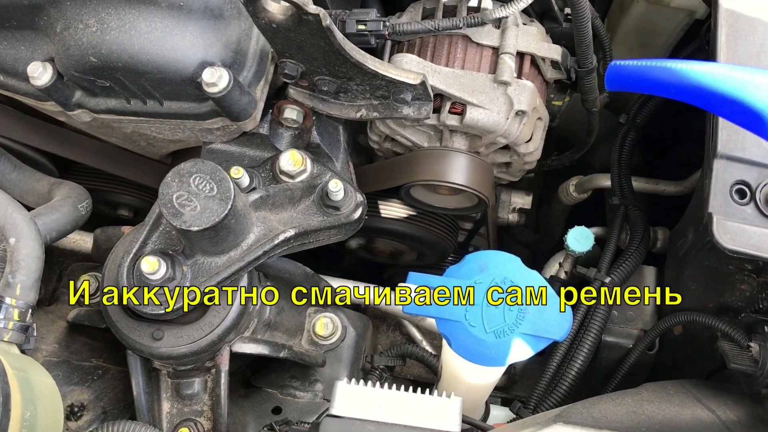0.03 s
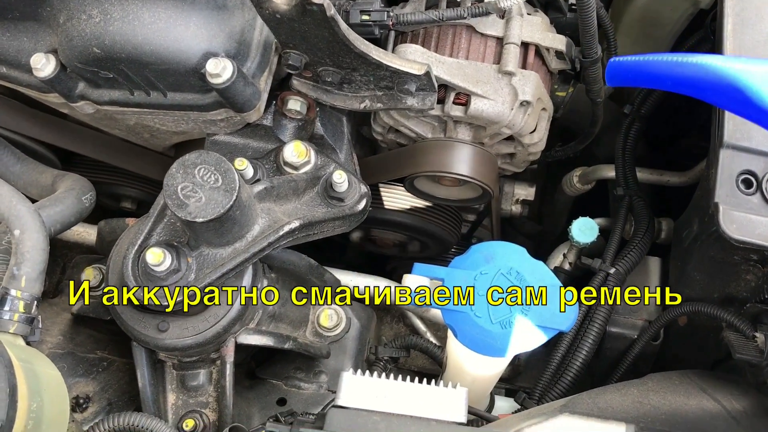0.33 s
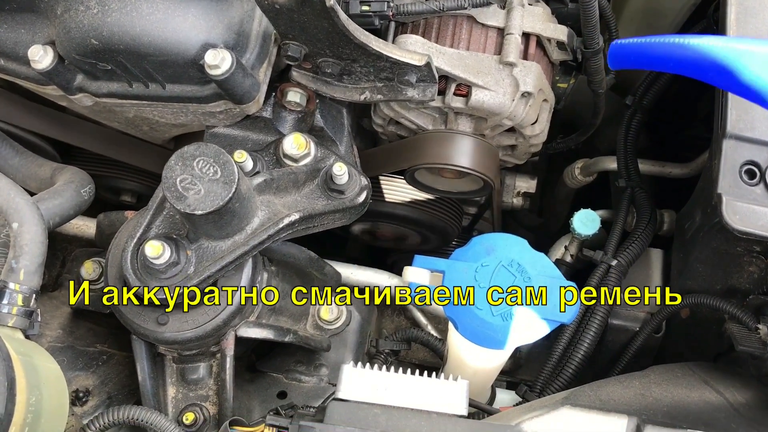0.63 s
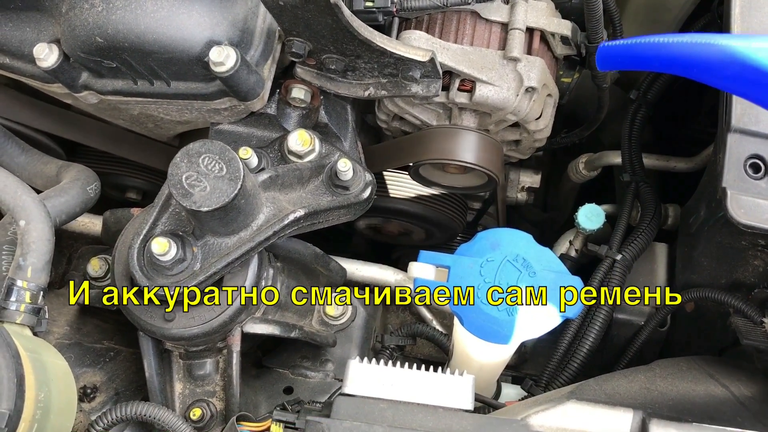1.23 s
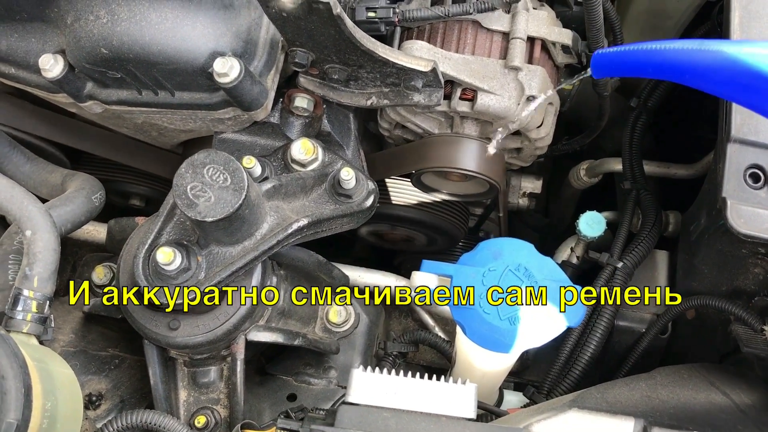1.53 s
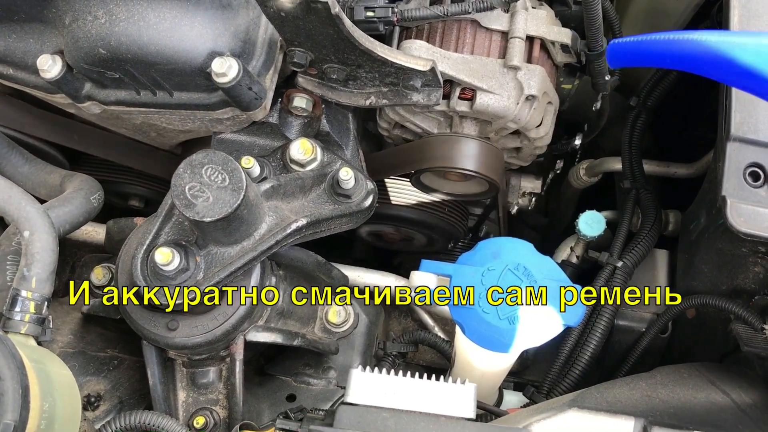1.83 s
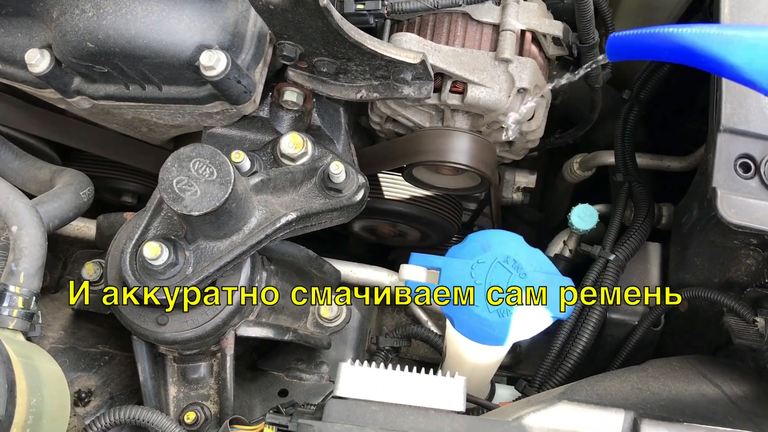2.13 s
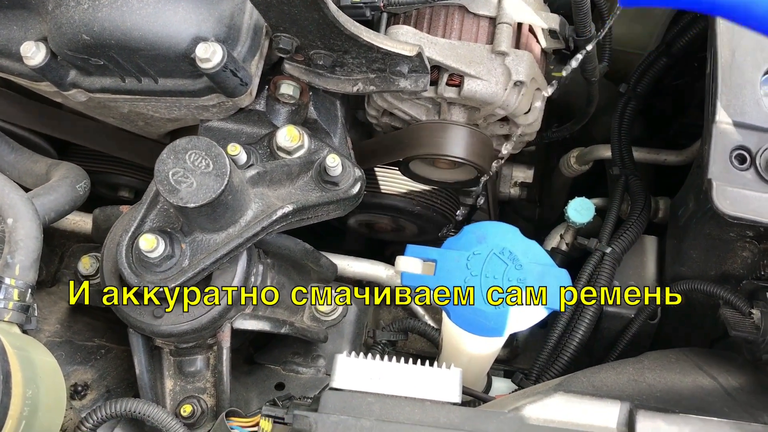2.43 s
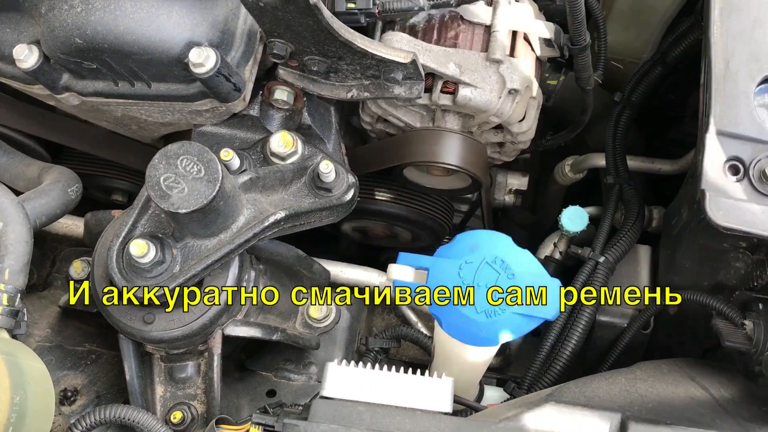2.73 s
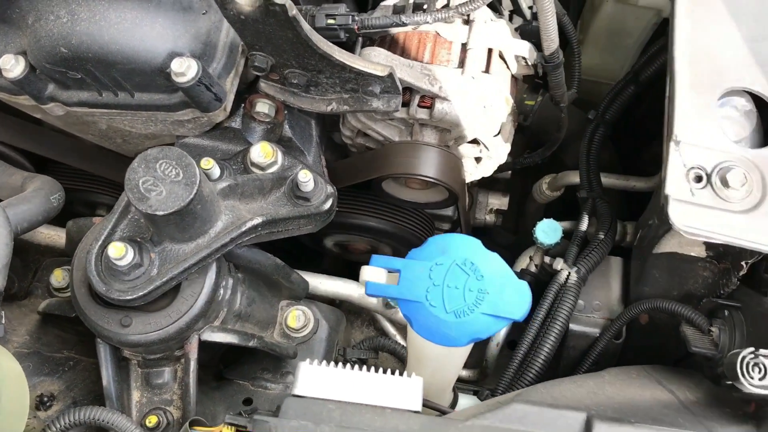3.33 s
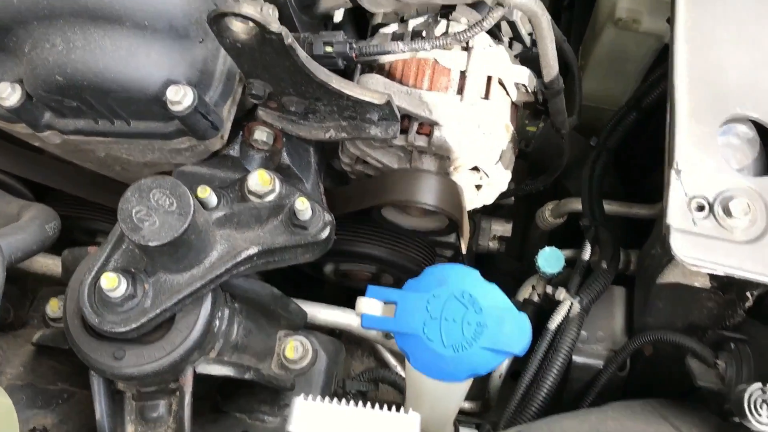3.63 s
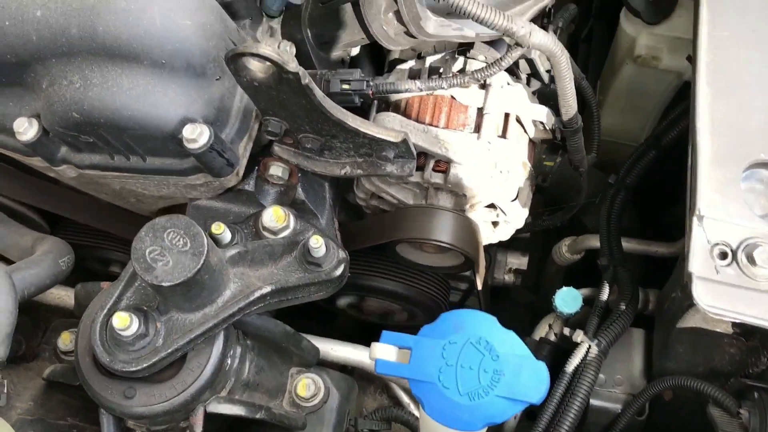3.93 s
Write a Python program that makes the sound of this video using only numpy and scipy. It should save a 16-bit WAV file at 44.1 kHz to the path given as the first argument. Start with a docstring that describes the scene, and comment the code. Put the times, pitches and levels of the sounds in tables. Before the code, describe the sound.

Shrill chirps from a slipping belt die away while a petrol engine idles on, ticking.

```python
"""A four-cylinder petrol engine idles, heard close above the open bonnet. From the start its ribbed
drive belt slips on a pulley in clusters of short, shrill chirps, while injectors tick, valve gear
clatters and the block knocks and hums. After a second come a few soft puffs of air. At about two and
a half seconds, water poured on the belt (itself unheard) makes it grip: the chirps die away and the
engine idles on, ticking a little louder."""
import sys
import numpy as np
from scipy import signal
from scipy.fft import rfft, irfft
from scipy.io import wavfile

SR = 44100
rng = np.random.default_rng(int(sys.argv[2]) if len(sys.argv) > 2 else 0)


def persist_wave(psi):
    """Save psi, clipped to +-1, as 16-bit WAV."""
    counts = np.round(np.clip(psi, -1, 1) * 32767).astype(np.int16)
    wavfile.write(sys.argv[1], SR, np.atleast_2d(counts).T)


N = 176400

# Loud belt slips. Each row: peak time in seconds, relative level in dB, pitch it sags to in Hz.
LOUD_SLIPS = [(0.0021, -18.5, 8970), (0.0518, -20, 8850), (0.0629, -17.5, 8660), (0.101, -18, 8900),
              (0.112, -16.5, 8400), (0.151, -13.5, 8370), (0.1618, -12.5, 8580), (0.1998, -17, 8840),
              (0.2095, -15, 8160), (0.2135, -15, 8250), (0.2606, -22, 8800), (0.274, -23, 8700),
              (0.3109, -19, 8720), (0.3612, -20.5, 8660), (0.374, -23.5, 8970), (0.3997, -18.5, 8800),
              (0.4098, -18.5, 9350), (0.4496, -14, 8800), (0.4606, -12, 8840), (0.5248, -21.5, 8800),
              (0.5502, -21, 8970), (0.6003, -20, 8770), (0.6492, -16, 8170), (0.6533, -21, 8400),
              (0.662, -18.5, 9400), (0.7009, -13, 8130), (0.7045, -19, 8400), (0.7121, -14.5, 8220),
              (0.763, -18, 8760), (0.803, -17, 8830), (0.8135, -18.5, 8900), (0.8522, -17, 8800),
              (0.864, -17.5, 8700), (0.9018, -18, 8200), (0.905, -18, 8300), (0.914, -13, 8900),
              (0.9534, -14.5, 8630), (0.963, -15, 8100), (0.9662, -20.5, 8280), (0.9786, -29, 8760),
              (1.0154, -20, 8450), (1.0285, -20, 8600), (1.0655, -19.5, 8700), (1.0782, -18, 8820),
              (1.1045, -25, 8900), (1.1164, -22.5, 8570), (1.1298, -22, 8940), (1.1546, -18, 8670),
              (1.1659, -22, 9400), (1.205, -14, 8350), (1.217, -16, 8900), (1.2802, -22, 8740),
              (1.306, -17.5, 8820), (1.3308, -19.5, 8900), (1.3552, -18.5, 8840), (1.368, -24, 8750),
              (1.3939, -22, 8820), (1.4062, -11, 8310), (1.4182, -24, 9000), (1.455, -16, 7970),
              (1.4587, -15.5, 8370), (1.4673, -17.5, 8580), (1.5195, -15.5, 8520), (1.558, -18, 8900),
              (1.5682, -19, 8650), (1.5825, -23, 8800), (1.6084, -22, 8810), (1.6196, -15, 8600),
              (1.6582, -17, 8820), (1.6695, -18, 8830), (1.7086, -15, 8600), (1.7192, -16, 8750),
              (1.772, -18.5, 8530), (1.7838, -24, 8700), (1.8216, -20, 8800), (1.835, -17, 8170),
              (1.8714, -22, 8820), (1.8847, -21.0, 8700), (1.8964, -24, 8750), (1.9092, -17.5, 8930),
              (1.9608, -13, 8310), (2.0214, -24.5, 8330), (2.0609, -22.5, 8240), (2.111, -20.5, 8300),
              (2.1359, -24, 8700), (2.161, -15.5, 8300), (2.2136, -9, 8190), (2.2632, -22, 8400),
              (2.275, -15, 8360), (2.324, -25.5, 8500), (2.3748, -19.5, 8560), (2.4117, -24, 9040),
              (2.425, -22, 8600), (2.4632, -20, 8650), (2.525, -24.5, 8530)]
# Faint slips in between. Each row: time in seconds, relative level before fading in dB.
CREEP_LEVEL = [(0, -32), (1.85, -32), (2.1, -31), (2.6, -34)]
# The pulley's ring. Each row: pitch in Hz, bandwidth in Hz, gain in dB.
PULLEY_MODES = [(8480, 250, -3.5), (8900, 72, -15), (8600, 96, -18)]
# Tone of scuffed rubber. Each row: frequency in Hz, gain in dB.
SCUFF_EQ = [(500, -18), (1600, -4), (3200, -11), (5000, -2), (7000, -2.5), (9500, 0), (16000, -3)]
# Idle speed. Each row: time in seconds, firings per second.
FIRING_RATE = [(0, 37.75), (.28, 37.7), (.38, 36.93), (1.9, 36.93), (2.1, 36.965), (3.58, 36.965),
               (3.72, 36.45), (4, 36.4)]
# The cylinders in firing order. Each row: tick accent in dB, knock accent in dB.
CYLINDER_ACCENTS = [(5.5, 2.5), (3, -1), (2.5, 3), (3.5, 0)]
# Tone of an injector click. Each row: frequency in Hz, gain in dB.
TICK_EQ = [(2500, -15), (4500, -10), (5800, -3.5), (7600, -12), (9000, -4), (10000, 0), (10450, -0.5),
           (11100, 0.5), (12300, 0), (13100, 4), (14100, -11), (15500, 2), (16500, -11)]
# Fader for the injectors. Each row: time in seconds, gain in dB.
TICK_FADER = [(0, -35), (1.2, -36), (2.2, -34.5), (2.7, -32.5), (3.3, -32), (4, -31.5)]
# Each injector's ring. Each row: cylinder number, pitch in Hz, relative level in dB.
INJECTOR_NOTES = [(0, 10820, 0), (0, 12330, 4), (0, 13400, -1), (0, 15480, 5), (1, 9230, -3), (1, 13070, 2),
                  (1, 14660, 1), (1, 15270, 2), (2, 10080, -1), (2, 10940, 5), (2, 11170, 5), (2, 11920, 1),
                  (2, 13040, 3), (3, 11380, 0), (3, 12270, 1), (3, 13650, 0)]
# Tone of a knock in the block. Each row: frequency in Hz, gain in dB.
KNOCK_EQ = [(500, -28), (1100, -17), (1600, -9.5), (1900, -1.5), (2250, 0.5), (2700, -15.5), (3300, -12.5),
            (4500, -14), (6500, -29), (9000, -27)]
# The block's ring. Each row: pitch in Hz, relative level in dB.
BLOCK_NOTES = [(1500, -9.5), (1625, -12), (1835, 0), (1935, -5), (2100, -2), (2190, -4.5), (2300, -4),
               (2590, -4)]
# Harder knocks. Each row: start in seconds, relative level in dB, leading note in Hz.
HARD_HITS = [(.1832, -22, 1870), (.9139, -28, 2350), (1.1295, -24, 1840), (1.3187, -26, 2100),
             (1.3985, -22.5, 2200), (1.5638, -25, 1800), (2.4529, -25.5, 2060), (2.7792, -27, 1950),
             (2.8865, -24, 2120), (2.9695, -23, 2210), (3.4023, -21, 1860), (3.5092, -26, 2160),
             (3.7545, -24, 1950)]
# Tone of a valve tap. Each row: frequency in Hz, gain in dB.
VALVE_EQ = [(400, -14.5), (1200, -6.5), (2100, -6.5), (3300, 1), (4500, -8.5), (6500, -8), (8000, -11.5),
            (15000, -11.5)]
# The valve cover's rattle. Each row: pitch in Hz, relative level in dB.
COVER_NOTES = [(3170, 5.5), (3320, -1), (3560, -12.5), (4250, 2)]
# Engine hum and accessory whine. Each row: multiple of the firing rate, level in dB, waver in radians.
HUM_PARTIALS = [(1.67, -59.5, 0.64), (2.987, -48.5, 0.46), (3.966, -56, 0.21), (4.744, -53, 0.27),
                (4.99, -58.5, 0.13), (9.22, -58, 0.42), (9.425, -51, 0.6), (20.9, -51.5, 1.04),
                (23.07, -56.5, 1.3), (28.07, -51, 1.96), (43.45, -48.5, 1.3)]
# Tone of the whirr of belts, fan and intake. Each row: frequency in Hz, gain in dB.
WHIRR_EQ = [(20, -19.5), (40, -2), (65, 1), (100, -7.5), (190, -2), (275, -9), (335, -2), (410, -10),
            (560, -4), (900, -4.5), (1250, 1.5), (1600, 0), (2150, 1.5), (2800, -6), (3500, -5), (4600, -9),
            (5400, -5.5), (6500, -6), (7600, -11), (8700, -6.5), (10400, -17), (12000, -10.5),
            (16000, -13.5)]
# Air puffs. Each row: peak time in seconds, half length in seconds, pitch in Hz, level in dB.
AIR_PUFFS = [(1.047, .022, 46.3, -38), (1.38, 0.02, 73, -37.5), (1.482, 0.037, 76.7, -38.5),
             (1.543, 0.0345, 55.5, -40), (2.096, 0.012, 236, -35), (2.19, .02, 181.7, -40)]

SLIP_RISE_S, SLIP_FALL_S, SLIP_REF_DB = .00096, .00091, -18  # a slip's shape at the reference level
SLIP_GROWTH_DB = 24  # each such step above the reference makes a slip e times longer
SLIP_LIMIT_DB, HALF_SAG_HZ, SAG_S, WOBBLE_HZ = -11, 301, .0018, 136
CREEP_GAP_S, CREEP_HZ, CREEP_SPREAD_HZ, CREEP_FADE_DB_PER_S, GRIP_S = 1 / 85, 8900, 230, 60, 3
BELT_GAIN_DB, RASP_HZ, RASP_WIDTH_HZ, RASP_DB, SCUFF_DB = 1.34, 9400, 1200, -16.5, -14.5
BONNET_ECHO_S, BONNET_BOUNCE_DB, BAY_GAP_S, BAY_DB = .005147, -7.5, .0015, -10
INJECTOR_OPEN_S, RAIL_HZ, KNOCK_LAG_S = .0034, 5380, .0005
CYLINDER_COUNT = len(CYLINDER_ACCENTS)


def belt():
    """The slipping belt chirps and rasps, rings the pulley and scuffs its rubber."""
    tone, friction = chirps(list(LOUD_SLIPS) + list(creep()))
    band = signal.iirpeak(RASP_HZ, RASP_HZ / RASP_WIDTH_HZ, fs=SR)
    rasp = signal.lfilter(*band, signal.lfilter(*band, rng.standard_normal(N)))
    squeal = tone + friction * level(rasp, RASP_DB)
    pulley = sum(undb(db) * signal.lfilter(*signal.iirpeak(hz, hz / width, fs=SR), squeal)
                 for hz, width, db in PULLEY_MODES)
    scuff = friction * level(colour(rng.standard_normal(N), SCUFF_EQ), SCUFF_DB)
    return undb(BELT_GAIN_DB) * (squeal + pulley + scuff + bay_echoes(squeal))


def chirps(slips):
    """Each slip swells and dies in milliseconds while its pitch sags; hard slips last longer."""
    tone, friction = np.zeros(N), np.zeros(N)
    wobble = WOBBLE_HZ * wander(1100)
    limit = undb(SLIP_LIMIT_DB)
    for peak, db, hz in slips:
        span = np.arange(max(int((peak - .012) * SR), 0), min(int((peak + .02) * SR), N))
        t = span / SR - peak
        stretch = np.exp((db - SLIP_REF_DB) / SLIP_GROWTH_DB)
        swell = 2 * undb(db) / np.cosh(t / stretch / np.where(t < 0, SLIP_RISE_S, SLIP_FALL_S))
        swell = limit * np.tanh(swell / limit)  # the belt's swing saturates
        pitch = hz + HALF_SAG_HZ * (1 - np.tanh(t / SAG_S + 1)) + wobble[span]
        tone[span] += swell * np.sin(2 * np.pi * np.cumsum(pitch) / SR)
        friction[span] += swell
    return tone, friction


def creep(count=400):
    """Rows of faint, uneven slips that fade after each loud one and stop once the belt grips."""
    gap_dice, level_dice, pitch_dice = rng.standard_normal((count, 3)).T
    times = CREEP_GAP_S * np.cumsum(np.exp(.72 * gap_dice))
    loud_times = np.array(LOUD_SLIPS)[:, 0]
    last_loud = loud_times[np.maximum(np.searchsorted(loud_times, times) - 1, 0)]
    db = curve(CREEP_LEVEL, times) - CREEP_FADE_DB_PER_S * np.abs(times - last_loud) + 2 * level_dice
    hz = CREEP_HZ + CREEP_SPREAD_HZ * pitch_dice
    return np.c_[times, db, hz][times < GRIP_S]


def bay_echoes(squeal):
    """The squeal bounces three times off the bonnet and scatters round the engine bay."""
    lag = round(BONNET_ECHO_S * SR)
    bonnet = sum(undb(k * BONNET_BOUNCE_DB) * np.r_[np.zeros(k * lag), squeal][:N] for k in (1, 2, 3))
    tail = np.r_[np.zeros(int(BAY_GAP_S * SR)), burst(t60=.054)]
    return bonnet + undb(BAY_DB) * signal.fftconvolve(squeal, tail)[:N]


def injectors(firings, t):
    """Each injector clicks open and shut, rings with its own notes and pings the fuel rail."""
    clicks, rings, pings = 0, 0, 0
    for k, (tick_db, _) in enumerate(CYLINDER_ACCENTS):
        notes = [(hz, db) for cylinder, hz, db in INJECTOR_NOTES if round(cylinder) == k]
        times, gains = cycle_hits(firings, t, k, scatter_s=.00012, scatter_db=.8)
        pings += strike(times, gains, modes([(RAIL_HZ, 0)], t60=.065))
        for lag in (0, INJECTOR_OPEN_S):
            times, gains = cycle_hits(firings, t, k, scatter_s=.00012, scatter_db=.8)
            crack = burst(t60=.013) + undb(-14) * burst(t60=.05)
            clicks += strike(times + lag, gains * undb(tick_db), crack)
            rings += strike(times + lag, gains, modes(notes, t60=.021))
    ticking = level(colour(clicks, TICK_EQ), 0) + level(rings, -1) + level(pings, -12)
    return (ticking + level(injector_zips(firings, t), -9)) * undb(curve(TICK_FADER, t))


def injector_zips(firings, t, cylinder=3, start_hz=11900, rise_hz_per_s=280000):
    """One injector adds a tiny upward zip each time it fires."""
    age = t[:1024]
    sweep = np.sin(2 * np.pi * (start_hz + .5 * rise_hz_per_s * age) * age)
    times, gains = cycle_hits(firings, t, cylinder, scatter_s=.00014, scatter_db=0)
    return strike(times, gains, sweep * bell_curve(age, peak_s=.0055, half_s=.002))


def block(firings, t):
    """Each firing knocks in the block and leaves it ringing."""
    knocks, rings = 0, 0
    for k, (_, knock_db) in enumerate(CYLINDER_ACCENTS):
        times, gains = cycle_hits(firings, t, k, scatter_s=.0006, scatter_db=2.5)
        hits = times + KNOCK_LAG_S, gains * undb(knock_db)
        knocks += strike(*hits, burst(t60=.031))
        rings += rattle(*hits, BLOCK_NOTES, t60=.075)
    return level(colour(knocks, KNOCK_EQ), -42) + level(rings, -40)


def hard_knocks(t60=.06):
    """Now and then a harder knock: a crack, one leading note and the ring of the block."""
    cracks, rings = 0, 0
    for start, db, hz in HARD_HITS:
        hit = np.array([start]), undb([db])
        cracks += strike(*hit, burst(t60=.035))
        rings += strike(*hit, modes([(hz, 0)], t60) + undb(-13) * modes(BLOCK_NOTES, t60))
    return rings + undb(11) * colour(cracks, KNOCK_EQ)


def valves(firings, t, count=12):
    """Light taps spread round the camshaft turn, each with its own ring; they rattle the cover."""
    hits = [cycle_hits(firings, t, k * CYLINDER_COUNT / count, scatter_s=.0005, scatter_db=2.5)
            for k in range(count)]
    taps = sum(strike(times, gains, burst(t60=.035)) for times, gains in hits)
    cover = rattle(*np.hstack(hits), COVER_NOTES, t60=.022)
    return level(colour(taps, VALVE_EQ), -36.5) + level(cover, -50.5)


def hum(firings, flutter_db=1.8):
    """Engine hum and accessory whine follow the idle speed, wavering in level and pitch."""
    tones = 0
    for multiple, db, waver in HUM_PARTIALS:
        gain = np.sqrt(2) * undb(db + flutter_db * wander(16))
        tones += gain * np.sin(2 * np.pi * (multiple * firings + rng.random()) + waver * wander(14))
    return tones


def whirr(firings, throb_db=.8):
    """Belts, fan and intake lay a bed of noise that throbs with the firings."""
    throb = undb(throb_db * np.cos(2 * np.pi * (firings - .15)) + .5 * wander(24.38))
    return throb * level(colour(rng.standard_normal(N), WHIRR_EQ), -30)


def puffs(t):
    """Puffs of air and soft hollow bumps: brief low swells with an unsteady pitch."""
    air = 0
    for peak, half, hz, db in AIR_PUFFS:
        swell = np.sqrt(2) * undb(db) * bell_curve(t, peak, half)
        air += swell * np.sin(2 * np.pi * hz * t + 1.66 * wander(44.83))
    return air


def cycle_hits(firings, t, offset, scatter_s, scatter_db, count=40):
    """Times and gains of a hit that comes once every four firings, slightly loose."""
    time_dice, level_dice = rng.standard_normal((count, 2)).T
    times = np.interp(np.arange(count) * CYLINDER_COUNT + offset, firings, t, left=-1, right=-1)
    return times + scatter_s * time_dice, undb(scatter_db * level_dice)


def strike(times, gains, ring):
    """Hits at the given times into one ringing body."""
    track = np.zeros(N + len(ring))
    for at, gain in zip(np.round(times * SR).astype(int), gains):
        if 0 <= at < N:
            track[at:at + len(ring)] += gain * ring
    return track[:N]


def rattle(times, gains, notes, t60, scatter_db=1.8):
    """Hits that never land alike: each shares its strength differently among the notes."""
    return sum(strike(times, gains * undb(scatter_db * rng.standard_normal(len(times))),
                      modes([note], t60)) for note in notes)


def modes(notes, t60, detune=.001, size=8192):
    """Metal rings at its notes, tuned a little differently for each point of contact."""
    t = np.arange(size) / SR
    tones = 0
    for hz, db in notes:
        pitch = hz * (1 + detune * rng.standard_normal())
        tones += undb(db) * np.sin(2 * np.pi * (pitch * t + rng.random()))
    return tones * np.exp(-np.log(1000) * t / t60)


def burst(t60, size=8192):
    """Dense ring of many metal parts: unit-energy noise that falls 60 dB in t60 seconds."""
    noise = rng.standard_normal(size) * np.exp(-np.log(1000) * np.arange(size) / SR / t60)
    return noise / np.linalg.norm(noise)


def colour(x, eq, size=8192):
    """Minimum-phase EQ: nothing rings ahead of an attack."""
    hz, db = np.array(eq, float).T
    gain = undb(np.interp(np.log(np.fft.rfftfreq(size, 1 / SR) + 1), np.log(hz), db))
    cepstrum = irfft(np.log(gain), size)
    cepstrum[1:size // 2] *= 2
    cepstrum[size // 2 + 1:] = 0
    return signal.fftconvolve(x, irfft(np.exp(rfft(cepstrum)), size))[:N]


def wander(rate, count=8192):
    """Random drift of unit rms, with `rate` new targets a second."""
    return level(np.interp(np.arange(N) * rate / SR, np.arange(count), rng.standard_normal(count)), 0)


def bell_curve(t, peak_s, half_s):
    """A smooth Gaussian fade in and out."""
    return np.exp(-.5 * ((t - peak_s) / half_s) ** 2)


def curve(rows, t):
    """Straight ramps between a table's rows."""
    return np.interp(t, *np.array(rows, float).T)


def level(x, db):
    """Set the rms level."""
    return x * undb(db) / np.sqrt(np.mean(x ** 2))


def undb(db):
    """Decibels to gain."""
    return 10 ** (np.asarray(db) / 20)


def scene():
    """The idle speed drives the engine's rhythm; the belt chirps over it."""
    t = np.arange(N) / SR
    firings = .085 + np.cumsum(curve(FIRING_RATE, t)) / SR  # running count of firings
    clatter = injectors(firings, t) + block(firings, t) + hard_knocks() + valves(firings, t)
    bed = hum(firings) + whirr(firings) + puffs(t)
    return (belt() + clatter + bed)[None]


def record(dry, top_hz=15800):
    """A steep low-pass trims the very top."""
    return signal.sosfilt(signal.ellip(12, .2, 80, top_hz, fs=SR, output="sos"), dry)


dry = scene()
out = record(dry)
persist_wave(out)
```